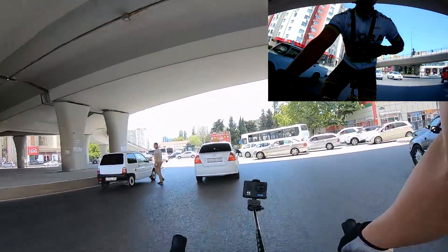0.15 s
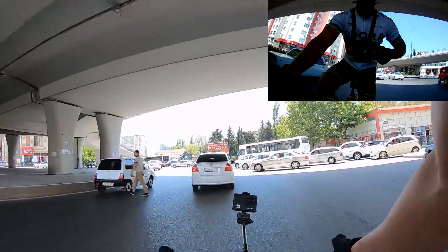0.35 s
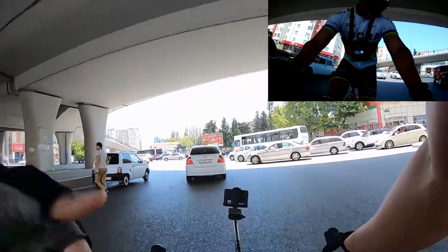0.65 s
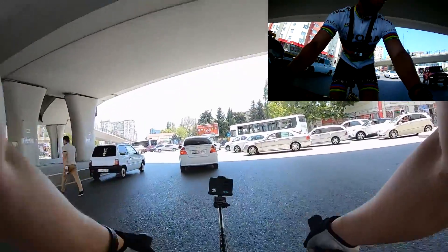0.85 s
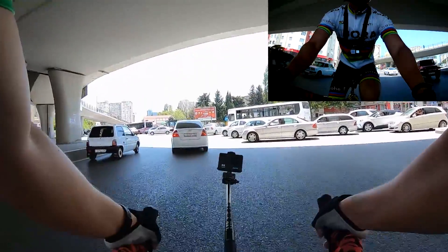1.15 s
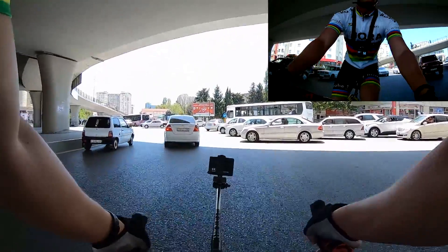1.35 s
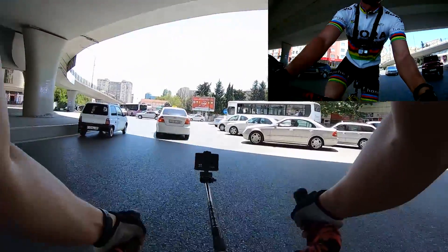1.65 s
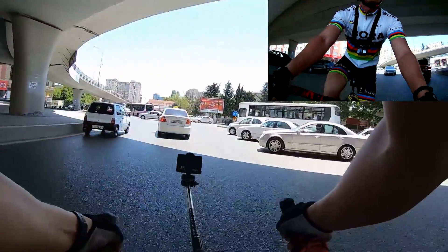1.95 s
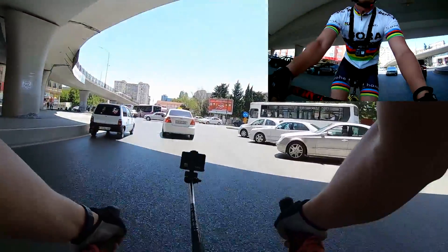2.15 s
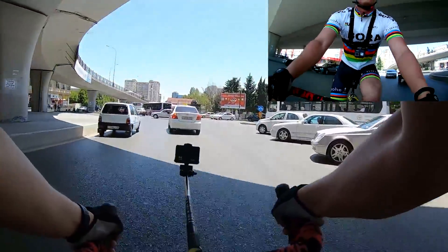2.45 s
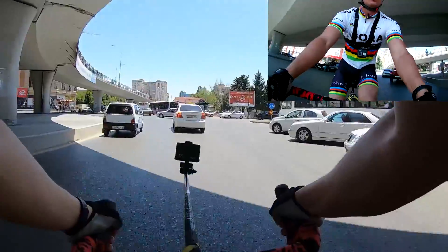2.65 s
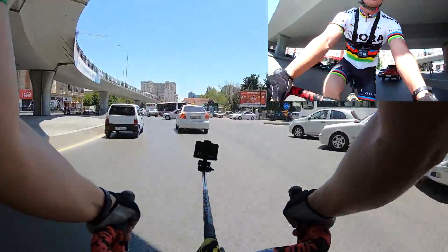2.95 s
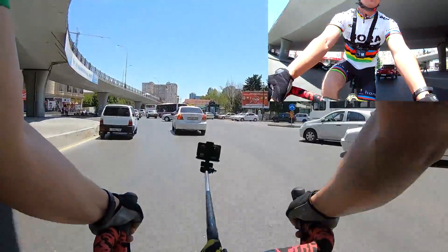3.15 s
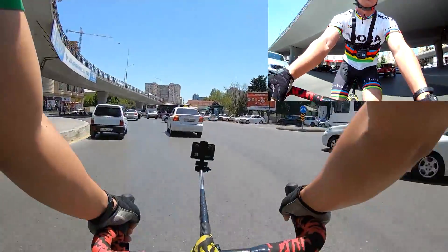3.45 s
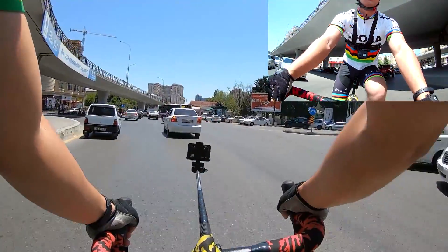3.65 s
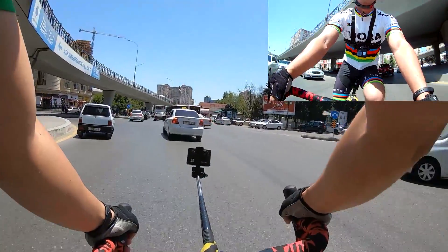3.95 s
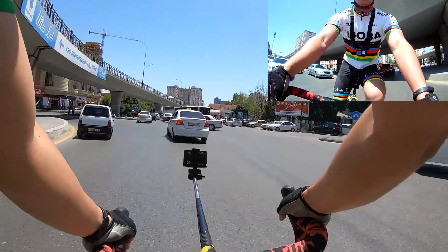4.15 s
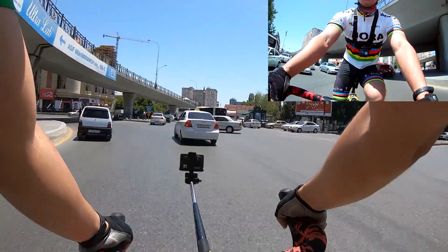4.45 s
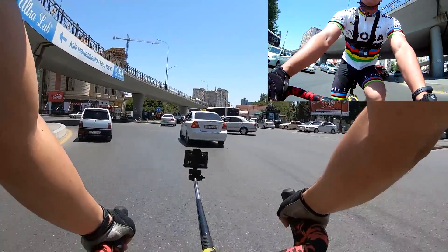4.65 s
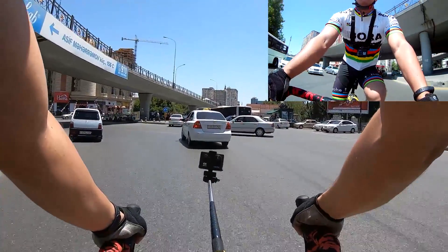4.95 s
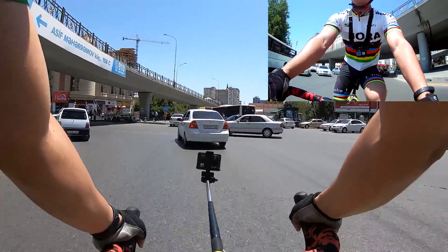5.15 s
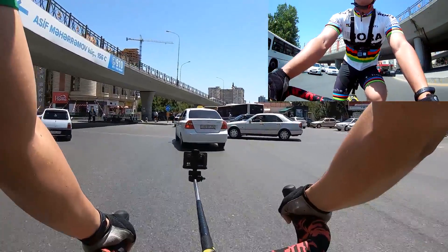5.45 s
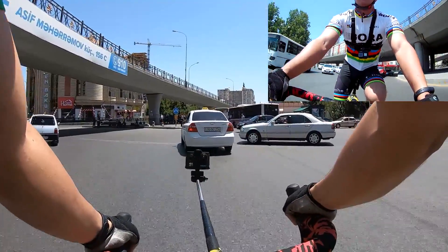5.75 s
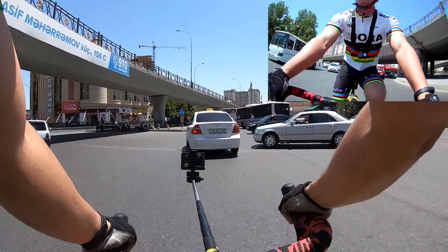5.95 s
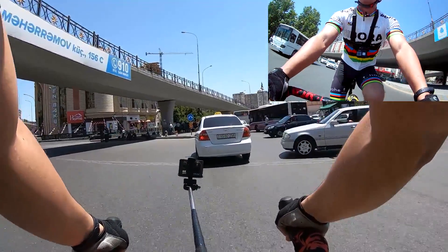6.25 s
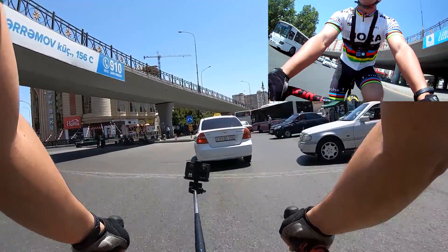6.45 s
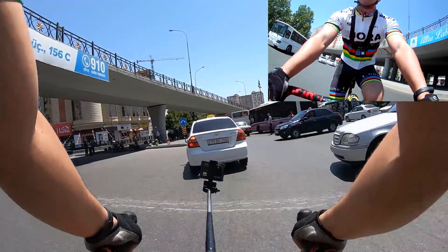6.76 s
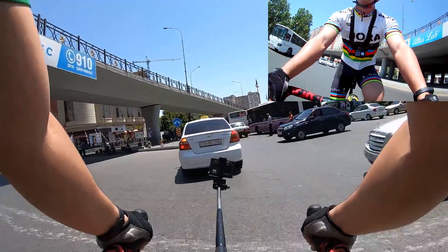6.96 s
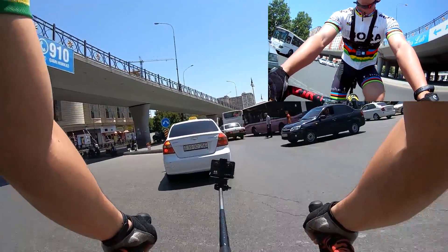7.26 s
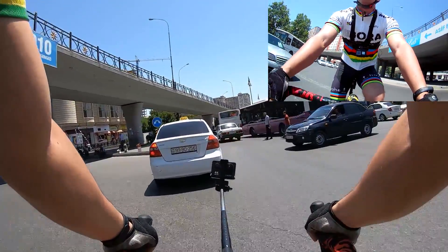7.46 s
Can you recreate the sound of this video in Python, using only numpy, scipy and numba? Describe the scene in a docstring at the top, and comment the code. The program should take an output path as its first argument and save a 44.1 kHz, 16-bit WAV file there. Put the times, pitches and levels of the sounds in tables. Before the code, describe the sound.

Riding a bicycle through traffic: low buffeting wind with sharp puffs, rolling tyre roar and hiss, quiet freewheel ticking, then an idling car's valve ticks.

```python
"""Wind rumbles and flutters on a microphone riding a bicycle, with sharp puffs, over the roar of city traffic.
Wind is band-limited noise held at a slowly varying strength, plus decaying low tones for the puffs;
brief swells of mid hiss, many with a puff, are band noise. Traffic is shaped noise: tyre roar, hiss, thin top.
Chain, freewheel, loose metal and the valve ticks of an idling car, growing louder near the end, are
scratches of noise that ring resonant modes; a wheel pings once a turn and a brake squeals faintly."""
import sys
import numpy as np
from scipy import signal
from scipy.fft import rfft, irfft
from scipy.io import wavfile
from scipy.ndimage import uniform_filter1d
from numba import njit

SR = 44100
rng = np.random.default_rng(int(sys.argv[2]) if len(sys.argv) > 2 else 0)


def dump(signal):
    """Clip the signal to [-1, 1] and save it as 16-bit WAV at the path in sys.argv[1]."""
    limited = np.clip(np.atleast_2d(signal).T, -1, 1)
    pcm = np.round(limited * 32767).astype(np.int16)
    wavfile.write(sys.argv[1], SR, pcm)


N = 335160
T = np.arange(N) / SR  # time [s]


def undb(db):
    """Amplitude ratio of a level in decibels."""
    return 10 ** (np.asarray(db) / 20)


def unit(x):
    """Normalisation to a root-mean-square value of 1."""
    return x / np.sqrt(np.mean(x ** 2))


def curves(table):
    """Linear interpolation in time of each column of a table."""
    s, *columns = np.transpose(table)
    return [np.interp(T, s, c) for c in columns]


@njit
def svf(x, hz, q):
    """State-variable resonator: band-pass of unit peak gain whose centre and Q may move every sample."""
    y, band_state, low_state = np.empty(len(x)), 0., 0.
    for i in range(len(x)):
        g, k = np.tan(np.pi * hz[i] / SR), 1 / q[i]
        v = (band_state + g * (x[i] - low_state)) / (1 + g * (g + k))
        band_state, low_state, y[i] = 2 * v - band_state, low_state + 2 * g * v, k * v
    return y


def band(x, hz, q):
    """Resonance at fixed or moving hz, with Q kept at 0.2 or more."""
    return svf(x, np.zeros(len(x)) + hz, np.zeros(len(x)) + np.maximum(q, .2))


def band_twice(x, hz, q, second_q):
    """Two resonances in cascade, whose skirts are steeper than those of one."""
    return band(band(x, hz, q), hz, second_q)


def walk(rate):
    """Slow random fluctuation: levels held 1 / rate s and averaged twice; spread near 1."""
    k = int(SR / rate)
    held = np.repeat(rng.standard_normal(N // k + 1), k)
    return 1.09 * uniform_filter1d(uniform_filter1d(held, k), k)[:N]


def coloured(spectrum, flicker_db, rate):
    """Spectral shaping of noise, in overlapping half-octave bands that each fluctuate alone."""
    hz, db = np.transpose(spectrum)
    f = np.maximum(np.arange(N // 2 + 1) * SR / N, 1)
    gain = undb(np.interp(np.log(f), np.log(hz), db, -120, -120))
    lines = rfft(rng.standard_normal(N)) * gain
    place = 2 * np.log2(f)  # position in half octaves
    out = 0
    for k in range(int(2 * np.log2(hz[0])), int(2 * np.log2(hz[-1])) + 2):
        share = np.clip(1 - abs(place - k), 0, 1)
        out = out + undb(flicker_db * walk(rate)) * irfft(lines * share, N)
    return unit(out)


def swirl(hz, q, settle_s, lump_db, rate):
    """Vortices of one size: steep-band noise arriving in lumps, its short-term power held steady."""
    lumps = rng.standard_normal(N) * undb(lump_db * walk(rate))
    x = band_twice(lumps, hz, q, q)
    k = int(settle_s * SR)
    power = uniform_filter1d(uniform_filter1d(x ** 2, k), k)
    return unit(x / np.sqrt(power + 1e-12))


def wind():
    """Turbulent pressure on the microphone port: buffeting rumble, loose eddies and lone puffs."""
    # rumble: (time [s], rumble level [dB], rumble centre [Hz], deep bass level [dB])
    rumble_table = [(0, -35.5, 71.3, -40), (.5, -37, 69.3, -33.5), (.9, -34, 87.3, -37),
                    (1.25, -37.5, 71, -35), (1.55, -36.5, 72.2, -34), (1.82, -27.5, 61.8, -32),
                    (2.1, -43.5, 67, -37), (2.35, -30.5, 66, -30.5), (2.8, -31, 75, -34.5),
                    (3.0, -34, 67.6, -35), (3.15, -25, 63.7, -32.5), (3.3, -28, 62.7, -42),
                    (3.45, -25.5, 67, -30), (3.65, -33.5, 64, -31), (3.8, -25.5, 66.4, -30),
                    (3.9, -27, 71, -44), (4.0, -26.5, 79.6, -30), (4.35, -26.5, 78, -30),
                    (4.6, -30.5, 81, -34), (4.8, -27.5, 84, -31), (4.95, -25.5, 89, -32),
                    (5.1, -30.5, 70, -38), (5.3, -23, 68.7, -30), (5.45, -26.5, 61, -41),
                    (5.65, -29.5, 82.4, -33.5), (5.9, -24.5, 69.6, -26.5), (6.05, -25.5, 69.8, -24),
                    (6.09, -31.5, 70, -27), (6.15, -21.5, 72, -24.5), (6.19, -32, 71, -40),
                    (6.9, -34, 69.8, -34.5), (7.22, -34.5, 72.6, -43), (7.4, -32.5, 74, -36),
                    (7.5, -28.5, 74.6, -30), (7.6, -39, 68.7, -30)]
    # eddies shed all the while: (time [s], level [dB])
    eddy_table = [(0, -36.5), (.5, -40), (1.2, -34), (1.9, -38.5), (2.3, -35), (3.0, -37.5), (3.75, -33),
                  (4.2, -43.5), (4.7, -36.5), (4.9, -40), (5.3, -33.5), (5.6, -40), (6.1, -36.5),
                  (6.4, -41.5), (6.9, -38), (7.6, -40)]
    # the rumble drops for an instant: (time [s], gain at the middle [dB])
    lull_table = [(1.87, -6), (2.01, -13), (3.53, -17), (3.665, -14), (3.74, -7), (3.9, -8), (4.22, -9),
                  (4.34, -2), (4.52, -22), (4.65, -1), (4.755, -20), (5.01, -7), (5.14, -4), (5.45, -6),
                  (5.57, -1.5), (5.68, -5), (6.08, -3), (6.36, -15), (6.6, -10)]
    # puffs, before rise and glide: (time [s], tone amplitude [dB], pitch [Hz], 60 dB decay [s], hiss [dB])
    puff_table = [(0.564, -18.5, 180, 0.054, -37), (0.823, -7, 197, 0.034, -39),
                  (0.847, -13, 196, 0.092, -44), (0.909, -17, 182, 0.075, -28.5),
                  (1, -11.5, 186, 0.11, -31), (1.09, -15.5, 188, 0.095, -46), (1.21, -17.5, 174, 0.06, -45),
                  (1.3, -9.5, 348, 0.042, -34), (1.324, -14, 298, 0.028, -34), (1.41, -9, 270, 0.033, -40),
                  (1.495, -10, 390, 0.024, -38), (1.535, -22, 300, .03, -35), (1.552, -22, 322, 0.034, -42),
                  (1.571, -13.5, 396, 0.038, -36), (1.6, -11, 328, 0.022, -33),
                  (1.69, -10.5, 298, 0.025, -31), (2.401, -15, 352, 0.13, -32), (2.43, -10, 240, 0.06, -42),
                  (2.484, -10, 228, 0.049, -28), (2.508, -5.5, 325, 0.045, -29),
                  (2.567, -11, 270, .035, -37), (2.59, -18.5, 310, 0.052, -40),
                  (2.626, -23, 323, 0.051, -47), (2.658, -17, 285, 0.028, -36),
                  (2.744, -14.5, 288, 0.056, -38), (2.785, -16, 300, 0.034, -34),
                  (2.833, -21, 310, 0.032, -42), (3.149, -30, 191, 0.044, -38),
                  (3.165, -14, 296, 0.045, -35), (3.238, -19, 201, .04, -25),
                  (3.415, -12.5, 220, 0.022, -27), (3.795, -19.5, 111, 0.055, -40),
                  (3.953, -19, 318, 0.041, -33), (4.292, -12.5, 127, 0.057, -35),
                  (4.358, -16, 222, 0.056, -27.5), (4.597, -18, 192, 0.057, -30),
                  (4.801, -18, 210, 0.044, -44.5), (4.985, -17, 210, 0.05, -43),
                  (5.185, -17, 75, 0.066, -40), (5.244, -13, 299, 0.043, -43), (5.272, -23, 90, 0.093, -35),
                  (5.294, -18, 230, 0.025, -23), (5.349, -24, 210, 0.038, -25),
                  (5.419, -14, 170, 0.04, -40), (5.651, -13, 200, 0.034, -37), (5.89, -10, 180, 0.026, -24),
                  (5.913, -12.5, 259, 0.023, -33), (5.981, -19.5, 294, 0.05, -34),
                  (6.018, -14.5, 260, 0.04, -31), (6.033, -10, 69, .09, -50),
                  (6.139, -7.5, 283, 0.023, -29), (6.154, -16, 170, 0.041, -37),
                  (6.442, -25, 212, 0.054, -52), (7.42, -24, 185, 0.19, -40), (7.498, -22, 201, 0.15, -34)]
    lull_s = 0.015  # half-width of a lull where its depth in dB is down to 1/e
    eddy_hz, eddy_wander = 170.4, 0.12  # middle pitch [Hz], spread of its logarithm
    eddy_q, eddy_lump_db = 0.72, 2
    deep_hz, buffet_db, buffets_per_s = 35.5, 2, 16

    rumble_db, rumble_hz, deep_db = curves(rumble_table)
    lull = undb(sum(db * np.exp(-((T - s) / lull_s) ** 2) for s, db in lull_table))
    rumble = undb(rumble_db + buffet_db * walk(buffets_per_s)) * swirl(rumble_hz, 0.94, 0.067, 2.5, 28)
    rumble += undb(deep_db) * swirl(deep_hz, 0.85, 0.22, .6, 9.5)

    eddy_db = curves(eddy_table)[0] + eddy_lump_db * walk(16)
    wandering_hz = eddy_hz * np.exp(eddy_wander * walk(11))
    eddies = swirl(wandering_hz, eddy_q, 0.065, 4.5, 40) * undb(eddy_db)

    t = T[:int(.2 * SR)]
    glide = 0.947 + 0.71 * np.exp(-t / 0.0025)  # each puff starts small and quick, then widens
    rise = 1 - np.exp(-(t / 0.0028) ** 2)
    for s, db, hz, t60, hiss_db in puff_table:
        noise = band_twice(rng.standard_normal(len(t)), 560, .8, .8)
        hiss = unit(band(noise, 560, 0.77)) * undb(hiss_db)
        thump = np.sin(2 * np.pi * np.cumsum(hz * glide) / SR) * undb(db)
        puff = (thump + hiss) * rise * undb(-60 * t / t60)
        at = int(s * SR)
        eddies[at:at + len(t)] += puff[:N - at]
    return rumble * lull + eddies


def gusts():
    """Vortex shedding past the housing: flutter on a gliding pitch with finer eddies above it."""
    # (start [s], length [s], start level [dB], end level [dB], start flutter [Hz], end flutter [Hz],
    #  sharpness Q [-], finer eddies against the flutter [dB])
    gust_table = [(0.545, 0.22, -33, -33, 173, 197, 3.1, -26), (0.854, 0.091, -30, -29, 190, 181, 4.9, -24),
                  (0.902, 0.14, -27, -25, 178, 198, 4.4, -30), (1.053, 0.13, -31, -28.5, 188, 196, 5, -38),
                  (1.3, 0.076, -28, -38, 306, 256, 0.94, -8.5),
                  (1.373, 0.14, -35, -31.5, 297, 314, 1.14, -2),
                  (1.527, 0.13, -26.5, -34, 293, 320, 1.23, -4),
                  (1.664, 0.018, -33, -32.5, 270, 247, 1.8, -12),
                  (2.401, 0.054, -23, -28, 250, 229, 3.4, -10),
                  (2.48, 0.19, -24, -30.5, 272, 298, 3.2, -28),
                  (2.679, 0.29, -31, -33.5, 300, 280, 2.65, -25),
                  (3.124, 0.16, -32, -35, 178, 215, 0.69, -31),
                  (3.96, 0.13, -30, -33.5, 120, 106, 2.8, -32),
                  (4.682, 0.044, -20, -39, 116, 102, 2.6, -27),
                  (4.775, 0.16, -33, -26.5, 90, 125.6, 4.9, -30),
                  (5.724, 0.12, -36, -35.5, 126, 116, 2.4, -31),
                  (7.293, 0.25, -38.5, -33.5, 196, 178, 0.83, -33)]
    rise_s, fall_s = 0.01, 0.033
    fine_ratio = 1.52  # pitch of the finer eddies over the flutter
    lump_db, settle_s = 1.2, .045
    out = np.zeros(N)
    for s, length, start_db, end_db, start_hz, end_hz, q, fine_db in gust_table:
        ends = [s, s + length]
        hz = np.interp(T, ends, [start_hz, end_hz])
        rise = np.clip((T - s) / rise_s, 0, 1)
        fall = np.exp(-np.maximum(T - s - length, 0) / fall_s)
        flutter = swirl(hz, q, settle_s, lump_db, 40)
        flutter += undb(fine_db) * swirl(fine_ratio * hz, 4.6, 0.089, 2.0, 49.44)
        out += flutter * rise * fall * undb(np.interp(T, ends, [start_db, end_db]))
    return out


def hiss_swells():
    """Transient band noise: brief swells of mid hiss rise and die away, many together with a puff of wind."""
    # (time of the top [s], rise [s], fall [s], level [dB], centre [Hz], sharpness Q [-])
    swell_table = [(.5, 0.13, 0.17, -44.5, 1350, 2.5), (0.801, 0.026, 0.12, -48, 1400, 1.5),
                   (1.31, 0.0077, 0.091, -40, 1100, 1.6), (1.42, 0.022, 0.068, -43, 1640, 2.4),
                   (1.44, 0.084, 0.3, -51, 2440, 2.7), (.62, 0.05, 0.1, -48, 1600, 1.7),
                   (.83, .03, 0.023, -41, 920, 4), (2.405, .004, 0.019, -33, 1040, 7.4),
                   (2.51, 0.0066, 0.033, -33.5, 760, 4.4), (3.201, 0.082, 0.05, -43, 900, 1.3),
                   (3.375, 0.0018, 0.012, -37.5, 686, 1.5), (3.77, 0.008, 0.022, -37.5, 870, 2.1),
                   (3.849, 0.046, 0.041, -42, 1280, 1.5), (5.151, 0.0018, 0.033, -38.5, 925, 1.8),
                   (5.35, 0.018, 0.054, -48, 1090, 1.3), (6.141, 0.0032, 0.0091, -38, 745, 1.7),
                   (6.02, 0.0035, 0.0088, -38, 600, 1.1), (7.423, .002, 0.028, -42, 644, 1.2),
                   (7.39, 0.07, 0.15, -51, 1380, 1.6), (7.141, 0.018, .03, -49, 1400, 2.4),
                   (7.51, 0.013, 0.033, -40, 950, 1.4)]
    bite = 0.88  # extra strength of the noise around the top, before filtering
    lead_s = .2  # room for the rise
    out, t = np.zeros(N + SR), T[:int(.6 * SR)] - lead_s
    for s, rise, fall, db, hz, q in swell_table:
        shape = np.where(t < 0, np.exp(-(t / rise) ** 2), np.exp(-t / fall))
        noise = rng.standard_normal(len(t)) * (1 + bite * np.exp(-(t / 0.0016) ** 2))
        at = int((s - lead_s) * SR)
        out[at:at + len(t)] += undb(db) * shape * unit(band_twice(noise, hz, q, q))
    return out[:N]


def traffic():
    """Broadband rolling and engine noise: roar with a tread resonance near 1 kHz, hiss and a thin top."""
    # levels before the common surge: (time [s], tyre roar [dB], hiss [dB], top hiss [dB])
    traffic_table = [(0, -38.5, -44.5, -67), (.15, -39, -45.5, -69.5), (.5, -36, -44.5, -69.5),
                     (1.15, -35.5, -47, -65.5), (1.28, -38.5, -46.5, -74), (1.44, -34.5, -47, -70),
                     (1.8, -41, -46, -69.5), (2.4, -36.5, -44.5, -70), (2.6, -38.5, -45.5, -68.5),
                     (2.9, -42, -47, -69), (3.18, -39, -46.5, -67), (3.55, -40.5, -47, -66),
                     (3.84, -37, -47, -67), (4.0, -39, -47.5, -67.5), (4.5, -43, -48.5, -67.5),
                     (5.12, -45, -48, -75), (5.2, -42.5, -47, -73), (5.35, -41, -47.5, -72),
                     (5.57, -43, -48.5, -70), (6.04, -42.5, -48, -74.5), (6.25, -46.5, -53, -81),
                     (6.55, -46.5, -52, -73), (6.75, -43.5, -50, -75), (7.05, -43, -47.5, -68),
                     (7.25, -39.5, -46.5, -65), (7.5, -41, -44, -64), (7.6, -39, -45.5, -64)]
    # relative spectrum of the tyre roar: (frequency [Hz], density [dB per Hz])
    roar_spectrum = [(180, -62.5), (300, -2.5), (409, -2), (615, -6), (709, -6), (1050, -6.5),
                     (1400, -14.5), (2500, -22), (3250, -30.5), (5500, -120)]
    # relative spectrum of the rolling and engine hiss: (frequency [Hz], density [dB per Hz])
    hiss_spectrum = [(700, -25.5), (1200, -3.5), (1600, -1.5), (2200, -8.5), (3000, -10), (4000, -14.5),
                     (5000, -19.5), (6500, -38), (8450, -58)]
    # relative spectrum of the thin top: (frequency [Hz], density [dB per Hz])
    top_spectrum = [(4500, -6.5), (5500, 4), (6800, 0), (7500, 0), (8200, 1.5), (9000, -11), (9500, -5.5),
                    (11000, -4.5), (12800, -8)]
    # tread whine of the nearest tyres: (time [s], centre [Hz], level against the roar [dB])
    tread_table = [(0, 844, -23), (.4, 875, -7), (.55, 854, -8.5), (.85, 834, -9), (1, 1003, -10),
                   (1.4, 1126, -12.5), (1.7, 1087, -16), (2.2, 1090, -11), (2.5, 1016, -7),
                   (2.8, 1130, -16), (3.4, 1070, -10), (3.85, 1000, -7.5), (4.2, 1045, -10), (5.2, 958, -7),
                   (6, 960, -8.5), (7.6, 1025, -19)]
    # two faint narrow hums of hiss while coasting: (time [s], level of each [dB])
    hum_table = [(5.2, -82), (5.8, -62.5), (6.8, -62.5), (7.1, -80)]
    hum_centres_hz, hum_q = (2650, 3390), 25
    surge_db, surges_per_s = 0.34, 14  # roar, hiss and top swell and sink together

    roar_db, hiss_db, top_db = curves(traffic_table)
    tread_hz, tread_db = curves(tread_table)
    broad = coloured(roar_spectrum, 1.7, 12)
    roar = broad + undb(tread_db) * unit(band(rng.standard_normal(N), tread_hz, 18.7))
    wash = roar * undb(roar_db)
    wash += coloured(hiss_spectrum, 1.0, 10) * undb(hiss_db)
    wash += coloured(top_spectrum, 1.2, 11) * undb(top_db)
    hum = sum(unit(band(rng.standard_normal(N), hz, hum_q)) for hz in hum_centres_hz)
    return hum * undb(curves(hum_table)[0]) + wash * undb(surge_db * walk(surges_per_s))


def clicks(rate, scatter_db, modes, smear_s):
    """Modal excitation: a short scratch of noise at each link or tooth rings a set of modes."""
    hit = np.flatnonzero(np.diff(np.floor(np.cumsum(rate) / SR))) + 1
    size = np.zeros(N)
    size[hit] = undb(scatter_db * rng.standard_normal(N // 400)[:len(hit)])
    envelope = signal.lfilter([1], [1, -np.exp(-1 / (smear_s * SR))], size)
    scratch = envelope * rng.standard_normal(N)
    return unit(sum(undb(db) * unit(band_twice(scratch, hz, hz / width, .5 * hz / width))
                    for hz, width, db in modes))


def bicycle():
    """Modal ringing of small parts, struck by chain and freewheel, plus loose metal clicks."""
    # chain over the sprocket: (time [s], clicks a second [1/s], level before fluctuation [dB])
    chain_table = [(1.4, 24, -110), (1.7, 21, -83), (3, 27, -90), (4.1, 21, -84), (4.35, 30, -110)]
    # freewheel pawls: (time [s], clicks a second [1/s], level before fluctuation [dB])
    freewheel_table = [(4.2, 69.2, -110), (4.4, 68.6, -78), (5.2, 70.3, -76), (5.9, 70, -76.5),
                       (6.5, 69, -79), (6.8, 66.1, -75), (7, 64.7, -72.5), (7.6, 62, -72)]
    # modes of the small parts: (frequency [Hz], width of the first resonance [Hz], relative level [dB])
    part_modes = [(8480, 180, 1.5), (7610, 120, -6), (7800, 450, 0.5), (8880, 250, -3.5), (9350, 500, -6)]
    # metal clicks and chirps: (time [s], ring peak [dB], pitch [Hz], length [s], broadband against ring [dB])
    metal_table = [(0.046, -55, 7950, .03, -17), (0.271, -43, 8300, 0.017, -19),
                   (0.444, -54, 8010, .03, -12), (.499, -56, 7620, .012, -14),
                   (0.662, -54, 7960, 0.003, 20), (.755, -55, 8120, .004, 2), (1.086, -51, 7200, .002, 12),
                   (1.106, -53, 8370, .002, 10), (3.768, -54, 7500, .006, 0)]
    snap_hz, snap_q = 2900, .55
    overtones = [(1.16, -9), (1.4, -6)]  # (frequency ratio [-], drive level [dB])
    out = np.zeros(N)
    for table in (chain_table, freewheel_table):
        rate, db = curves(table)
        out += clicks(rate, 1.5, part_modes, .006) * undb(db + 1.8 * walk(6))
    t = T[:int(.08 * SR)]
    for s, db, hz, length, broad_db in metal_table:
        envelope = np.exp(-(t / length) ** 2) * np.minimum(5 * t / length, 1)
        scrape = rng.standard_normal(len(t)) * envelope
        ring = band(scrape, hz, 12)
        ring += sum(undb(over_db) * band(scrape, ratio * hz, 12) for ratio, over_db in overtones)
        broad = band_twice(scrape, snap_hz, snap_q, snap_q)
        click = ring / abs(ring).max() + undb(broad_db) * broad / abs(broad).max()
        at = int(s * SR)
        out[at:at + len(t)] += undb(db) * click
    return out


def pings():
    """Periodic excitation: something brushes the wheel once a turn and rings one high note with a tail."""
    first_s, turn_s, ping_hz = 4.209, .2957, 7630
    peak_db = [-68, -68, -67, -67, -65, -63, -67, -67]  # turn by turn
    tail_s, tail_db = .12, -8  # tail of the brush, ahead of the resonance
    out, t = np.zeros(N), T[:int(.28 * SR)]
    for turn, db in enumerate(peak_db):
        brush = np.exp(-(t / 0.017) ** 2) + undb(tail_db) * np.exp(-t / tail_s)
        ring = band_twice(rng.standard_normal(len(t)) * brush, ping_hz, 45, 25)
        at = int((first_s + turn_s * turn) * SR)
        out[at:at + len(t)] += undb(db) * ring / abs(ring).max()
    return out


def idler():
    """Impact and modal response: each valve tick is a short scratch that rings the cylinder head."""
    # valve ticks of the idling car: (time [s], peak level [dB])
    valve_table = [(7.212, -60), (7.244, -56), (7.282, -60), (7.317, -48), (7.353, -50), (7.392, -49),
                   (7.429, -54), (7.466, -45), (7.507, -51), (7.543, -49), (7.579, -45)]
    # cylinder head: (frequency [Hz], width of the first resonance [Hz], relative level before scatter [dB])
    head_modes = [(7450, 200, 0), (7900, 260, -3), (6300, 500, -11), (5300, 500, -8), (4000, 600, -3),
                  (9200, 500, -15), (11400, 600, -13)]
    scatter_db = 3  # every tick strikes the modes differently
    out, t = np.zeros(N + SR), T[:int(.06 * SR)]
    for s, db in valve_table:
        scratch = rng.standard_normal(len(t)) * np.exp(-t / 0.0061)
        ring = 0
        for hz, width, mode_db in head_modes:
            strength = undb(mode_db + scatter_db * rng.standard_normal())
            ring = ring + strength * unit(band_twice(scratch, hz, hz / width, .5 * hz / width))
        at = int(s * SR)
        out[at:at + len(t)] += undb(db) * ring / abs(ring).max()
    return out[:N]


def squeal():
    """Faint brake squeal: a sinusoid with random frequency and level modulation that fades in and out."""
    start_s, length_s = 2.135, .125
    middle_hz, middle_db = 4090, -61
    shape = np.sqrt(np.sin(np.pi * np.clip((T - start_s) / length_s, 0, 1)).clip(0))
    level = undb(middle_db + 2.5 * walk(40))
    hz = middle_hz * (1 + 0.0048 * walk(60))
    return level * shape * np.sin(2 * np.pi * np.cumsum(hz) / SR)


def scene():
    """Linear superposition of all the sources, in one channel."""
    air = wind() + gusts() + hiss_swells()
    road = traffic() + squeal()
    machines = bicycle() + pings() + idler()
    return (air + road + machines)[None]


def record(dry):
    """Saturation and filtering: rounds peaks, steps the treble down, cuts the deepest bass and the top."""
    # microphone response, flat beyond its ends: (frequency [Hz], gain [dB])
    shelf = [(9300, -1), (9700, -12)]
    soft_top = 0.32  # level where the input stage rounds peaks off
    top_hz = 12450
    hz, db = np.transpose(shelf)
    dry = soft_top * np.tanh(dry / soft_top)
    both = np.concatenate([dry[:, ::-1], dry], axis=1)  # a mirrored lead-in lets the filters settle
    response = undb(np.interp(np.arange(N + 1) * SR / (2 * N), hz, db))
    both = irfft(rfft(both) * response, 2 * N)
    both = signal.sosfilt(signal.butter(2, 18, "high", fs=SR, output="sos"), both)
    return signal.sosfilt(signal.ellip(8, .2, 70, top_hz, fs=SR, output="sos"), both)[:, N:]


dry = scene()
out = record(dry)
dump(out)
```